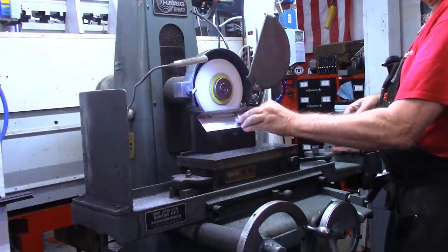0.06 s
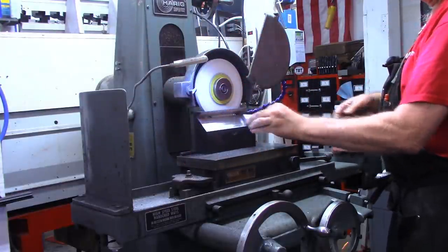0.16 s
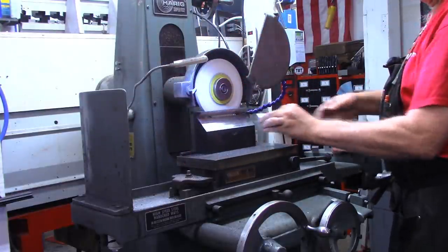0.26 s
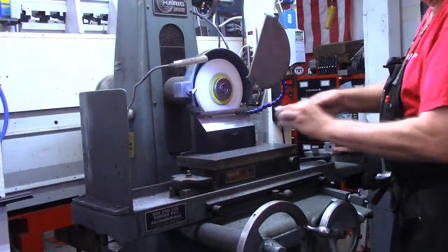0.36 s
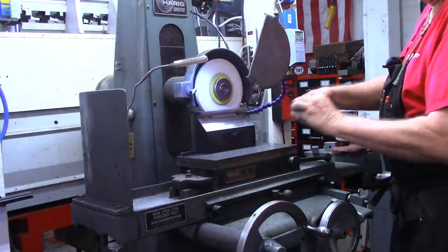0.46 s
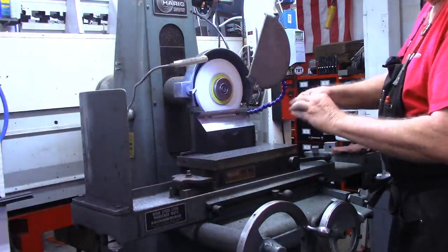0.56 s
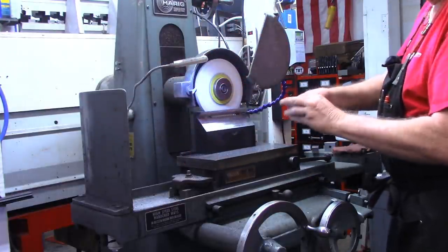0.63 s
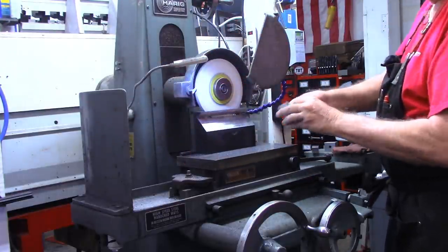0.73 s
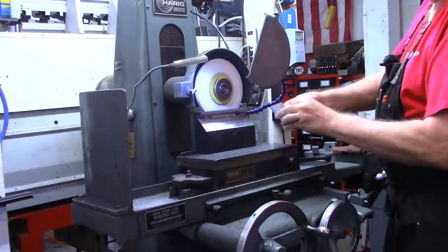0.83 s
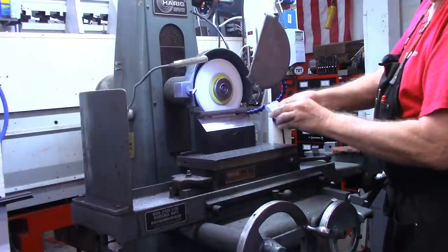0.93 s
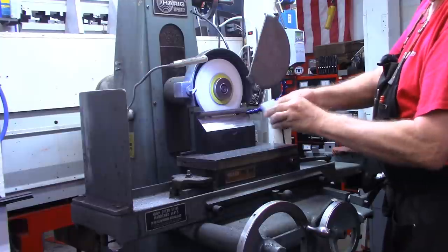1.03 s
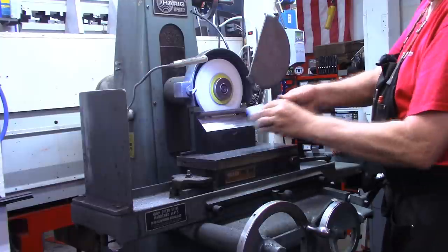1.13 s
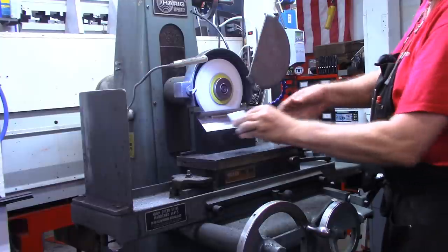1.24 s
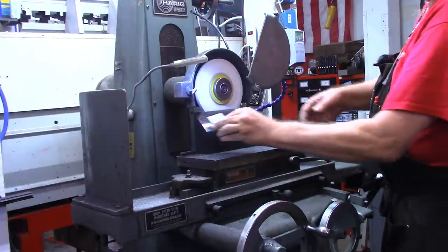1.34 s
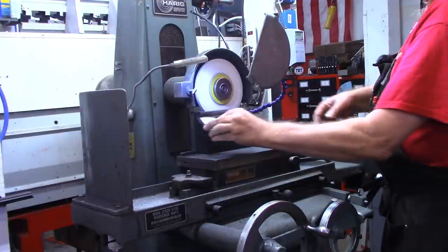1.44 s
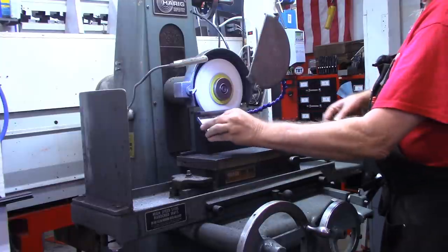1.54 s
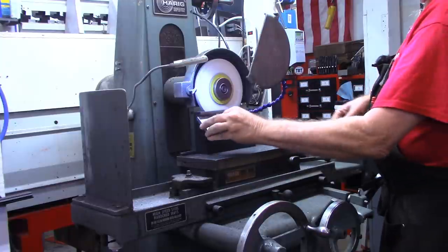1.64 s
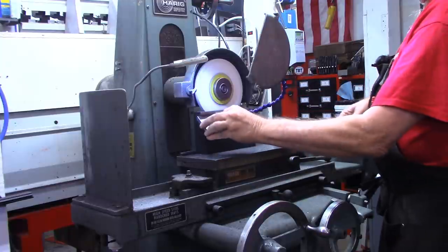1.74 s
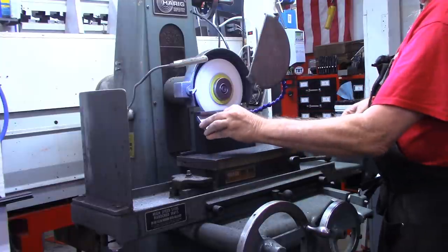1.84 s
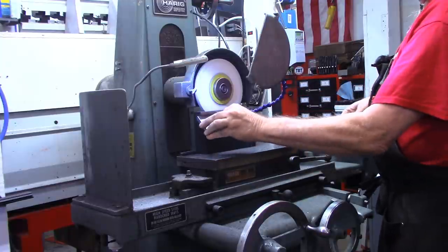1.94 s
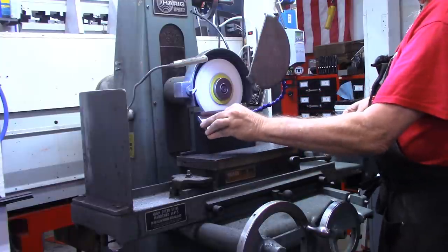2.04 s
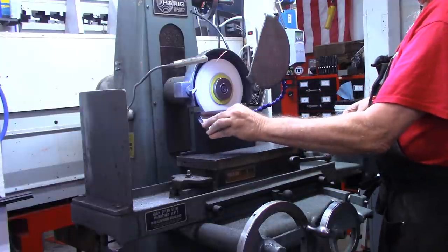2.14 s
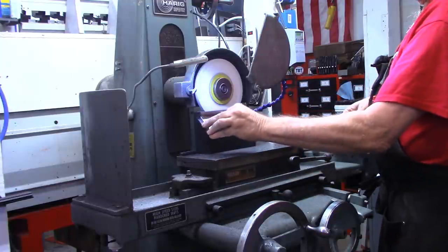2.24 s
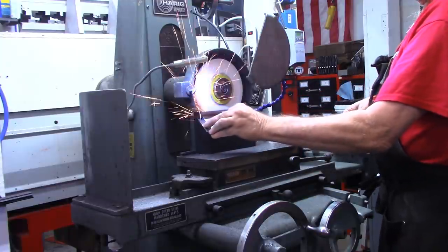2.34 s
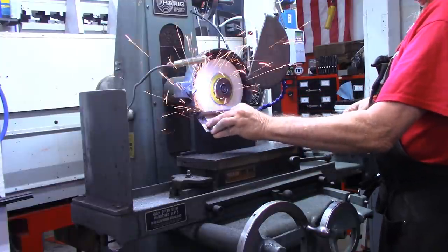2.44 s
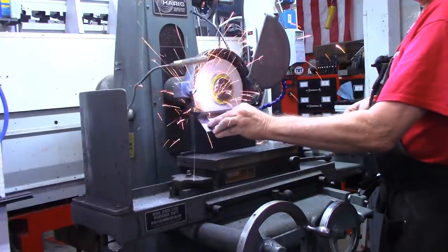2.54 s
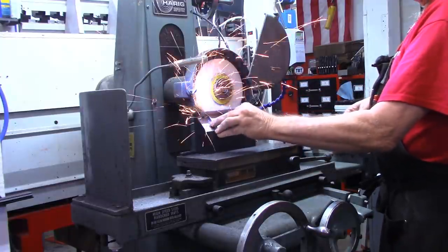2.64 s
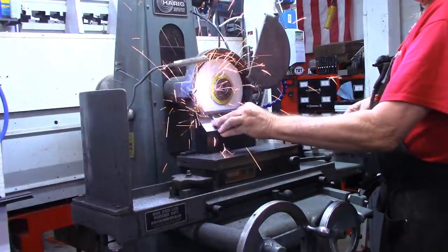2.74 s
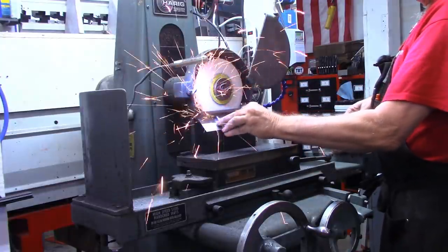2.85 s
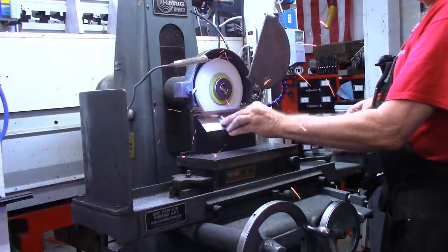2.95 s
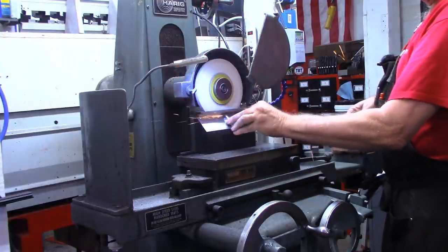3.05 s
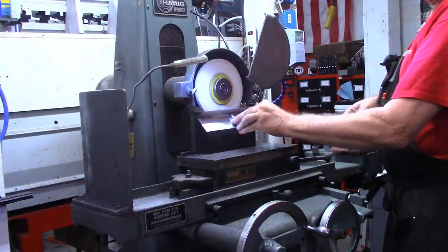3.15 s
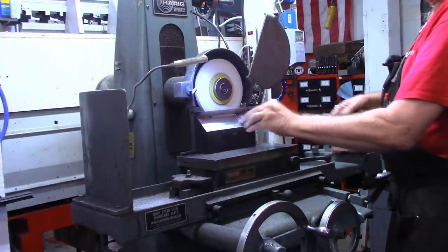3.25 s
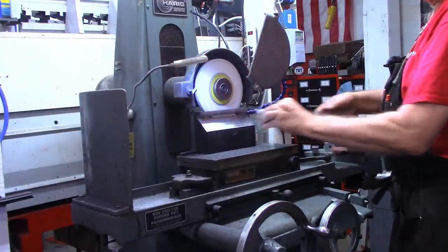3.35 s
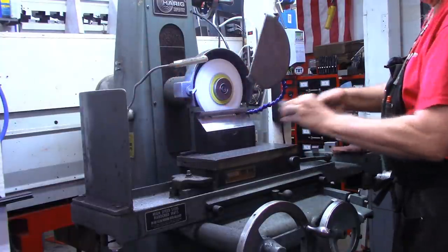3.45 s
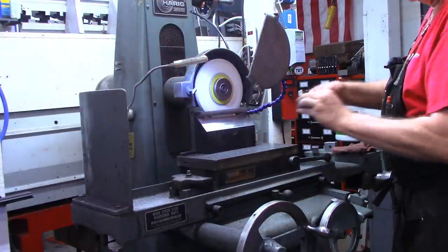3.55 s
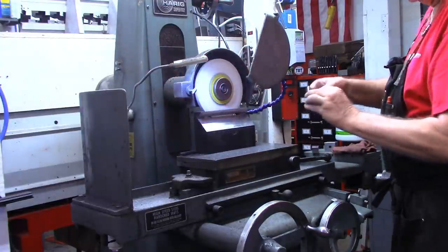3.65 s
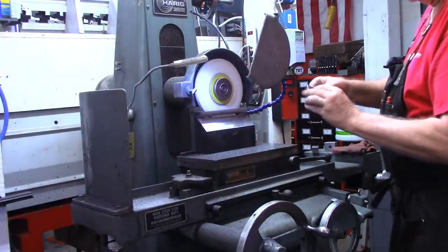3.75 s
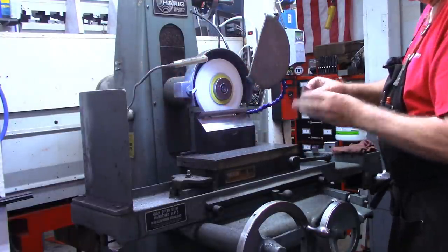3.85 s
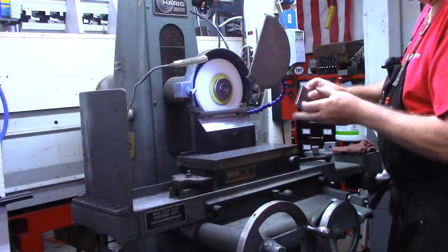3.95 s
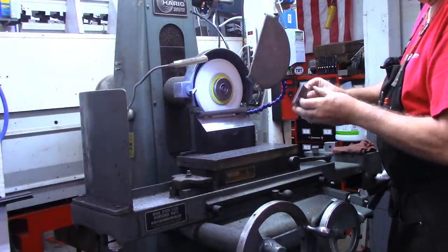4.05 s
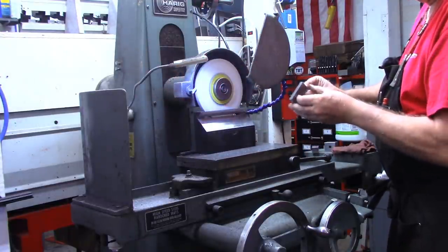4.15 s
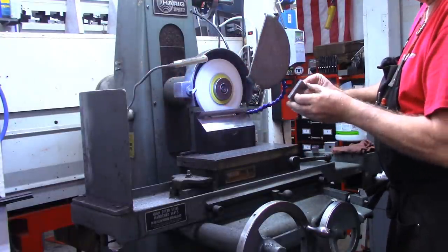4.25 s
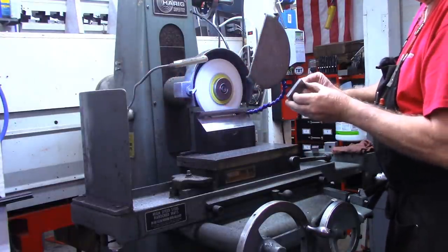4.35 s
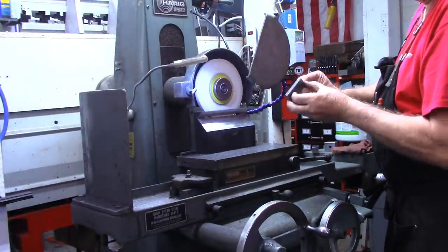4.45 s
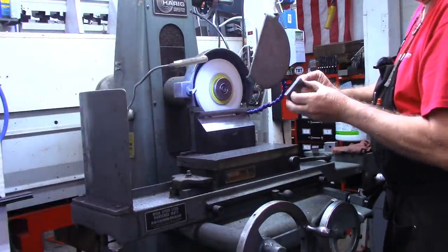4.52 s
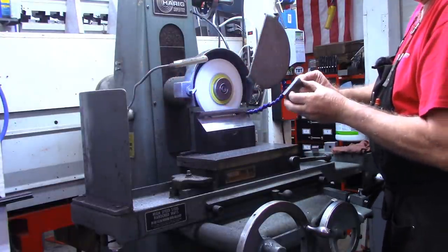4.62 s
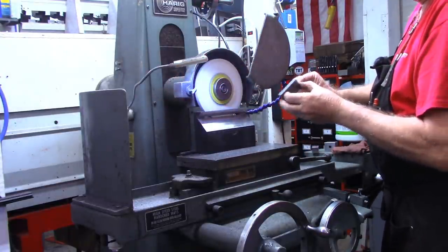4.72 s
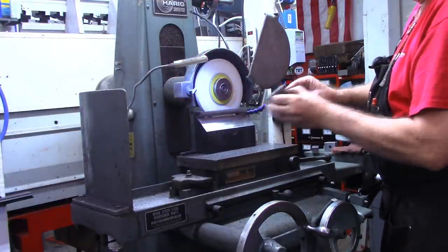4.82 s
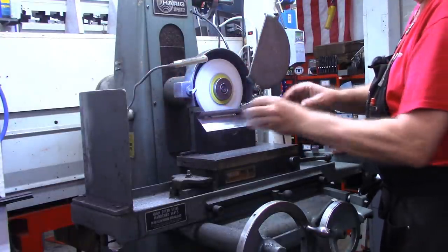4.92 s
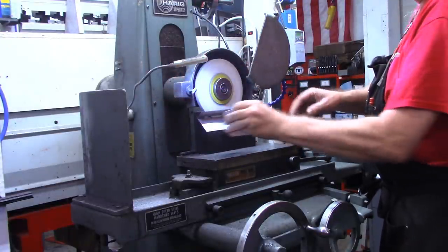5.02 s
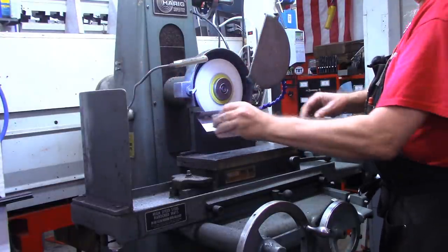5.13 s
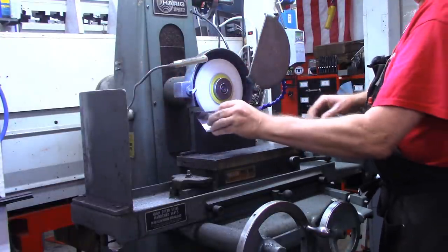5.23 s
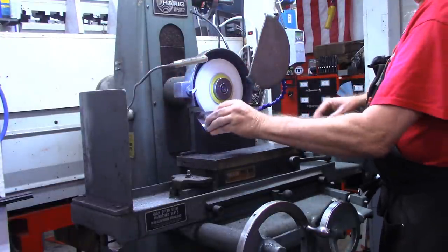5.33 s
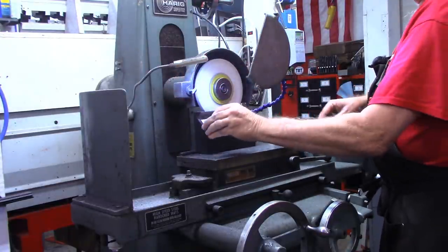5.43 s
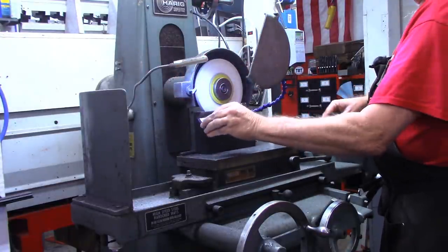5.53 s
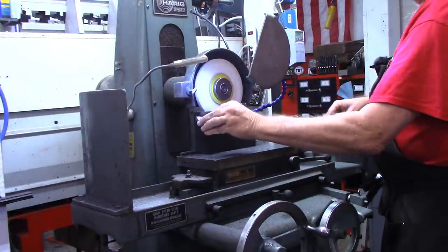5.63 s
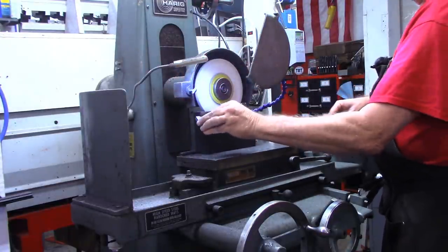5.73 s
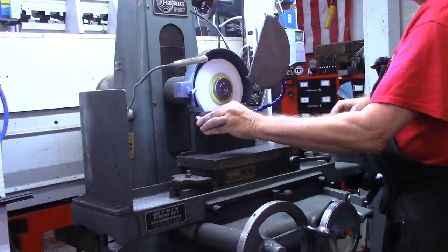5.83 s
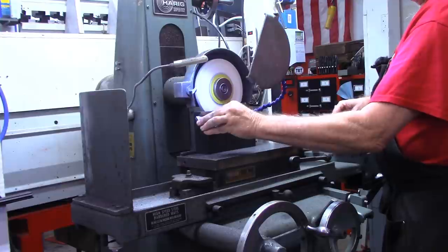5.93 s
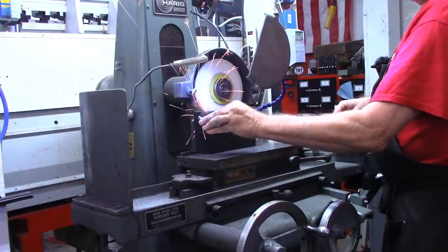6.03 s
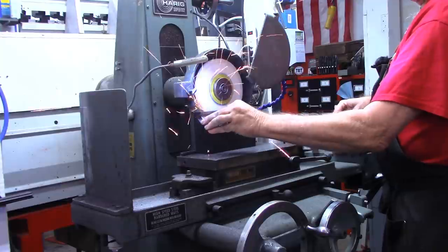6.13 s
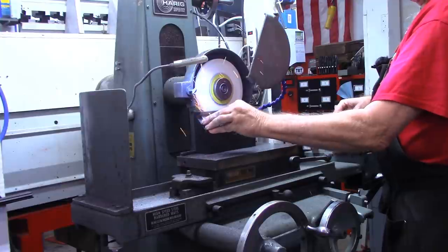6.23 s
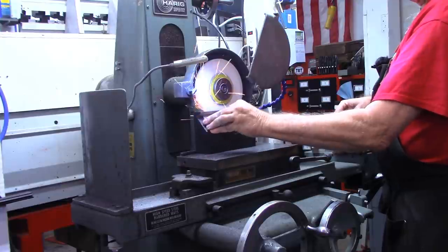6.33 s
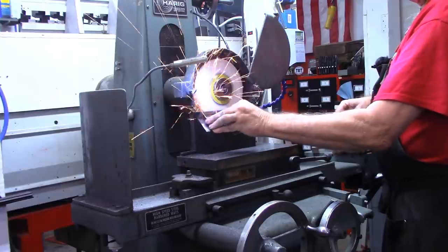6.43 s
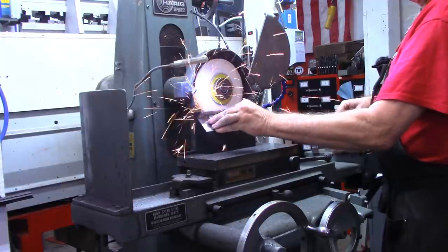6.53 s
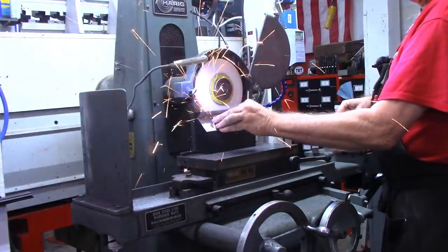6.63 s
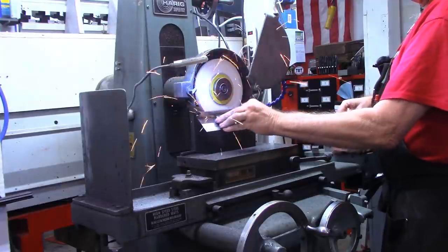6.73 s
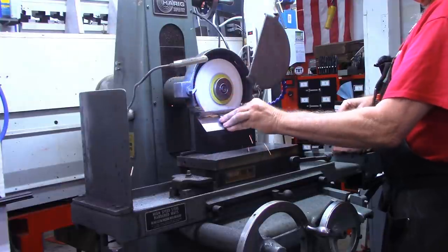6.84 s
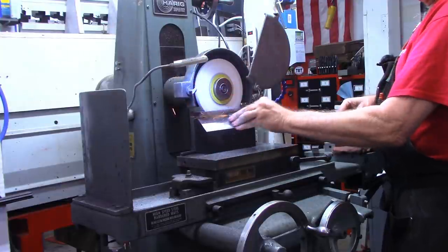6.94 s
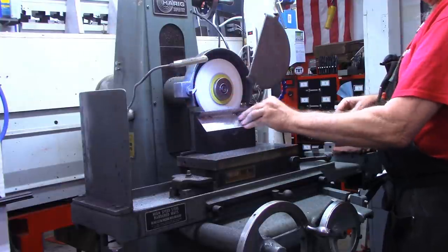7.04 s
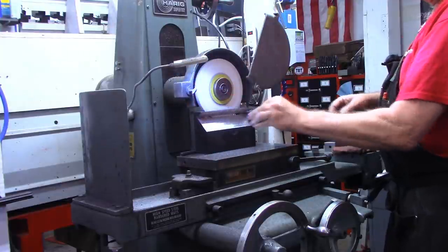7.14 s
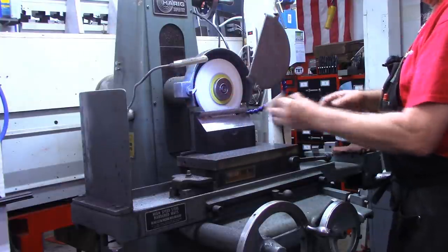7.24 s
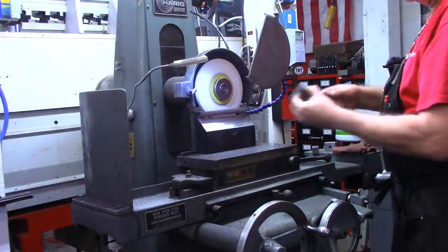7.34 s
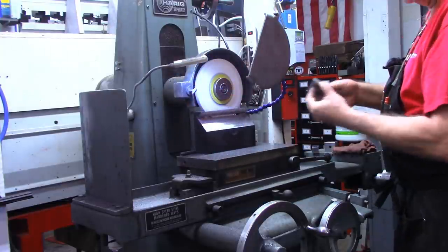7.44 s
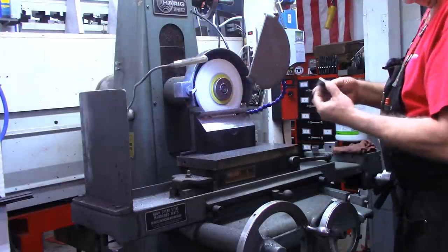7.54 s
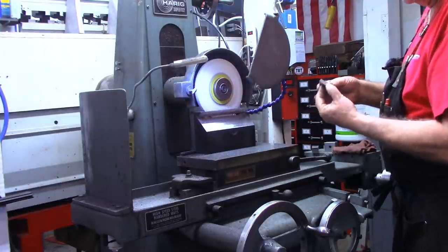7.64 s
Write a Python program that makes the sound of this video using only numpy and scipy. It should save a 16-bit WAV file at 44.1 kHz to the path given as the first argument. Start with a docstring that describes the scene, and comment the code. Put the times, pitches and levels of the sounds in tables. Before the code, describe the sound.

A grinding machine idles throughout in a workshop with little echo: a quiet airy whirr, a motor hum and a thin high whine, with occasional soft, low bumps. At about 1.6 and 1.9 seconds a small steel piece clicks lightly on the rest. It brushes the wheel at 2.2 seconds, then grinds loudly from 2.4 with a hissing scrape and a shrill metallic ring. Near 2.9 seconds the sound drops in level and rises into a rasp, stopping at 3.2. The machine idles alone until 5.7 seconds, when the steel grazes the wheel with a short, bright ring. A second pass runs from 6.0 to 7.1 seconds, briefly rising in pitch around 6.3, loudest around 6.5, then ending in a softer, higher rasp and a faint ring. The idling continues to the end at about 7.5 seconds.

```python
"""Grinding a small steel piece

In a workshop, a hand presses a steel piece against the wheel of a surface grinder, in two passes.
The wheel's grit repeats with every turn and shakes the piece at its natural tones (its modes);
tipping it onto an edge makes them rise and rasp. It clicks on the rest and rings when it grazes
the wheel. All along, the idling machine whirrs and hums, with soft low bumps."""
import sys
import numpy as np
from scipy import signal
from scipy.fft import rfft, irfft, next_fast_len
from scipy.io import wavfile
from scipy.ndimage import map_coordinates

SR = 44100
rng = np.random.default_rng(int(sys.argv[2]) if len(sys.argv) > 2 else 0)


def bounce(signal):
    """Save signal as a 16-bit WAV file at the path given by the first command-line argument."""
    frames = np.transpose(np.atleast_2d(signal))
    limited = np.clip(frames, -1, 1)
    pcm = np.round(limited * 32767).astype(np.int16)
    wavfile.write(sys.argv[1], SR, pcm)


N = 338688
TURN_HZ, TOP_HZ = 59.99, 15350  # turns of the wheel each second; highest frequency heard

# tone colour of grit scraping steel: (frequency [Hz], level [dB])
SCRAPE_COLOUR = [(300, -28.5), (1000, -6.5), (2600, 2), (3300, 1.5), (4000, 14.5), (4800, 9), (5300, 4),
                 (5850, 11), (6400, 7), (7300, 5), (7900, -1), (9300, 0), (11000, -5), (12500, -20),
                 (15200, -18.5)]
# tone colour of the shaking wheel and its guard: (frequency [Hz], level [dB])
WHEEL_COLOUR = [(100, -40), (230, -27), (320, -5.5), (430, -11.5), (520, -2.5), (650, 5.5), (820, 3),
                (1150, 4), (1900, 11), (2500, -7), (3500, -40)]


def amp(db):
    """Turn decibels into a gain."""
    return 10 ** (np.asarray(db) / 20)


def unit(x):
    """Scale a signal to an average (rms) level of 1."""
    return x / np.sqrt(np.mean(x ** 2) + 1e-20)


def wobble(rate, size):
    """A smooth random curve through `rate` new values a second."""
    knots = rng.standard_normal(int(size * rate / SR) + 4)
    return map_coordinates(knots, [np.arange(size) * rate / SR], mode="nearest")


def coloured(x, points):
    """Give x the tone colour of (frequency [Hz], level [dB]) points, at an average level of 1."""
    size = next_fast_len(len(x) + 8192)
    hz, db = np.transpose(points)
    gain = amp(np.interp(np.log(np.fft.rfftfreq(size, 1 / SR) + 1), np.log(hz), db))
    return unit(irfft(rfft(x, size) * gain, size)[:len(x)])


def add(track, start, sound):
    """Mix a sound into the track at `start` seconds."""
    part = track[round(start * SR):][:len(sound)]
    part += sound[:len(part)]


def fade(t, t60):
    """Die away by 60 dB every t60 seconds."""
    return np.exp(-np.log(1000) * t / t60)


def machine_tones(lines, waver_db, waver_rate, drift_hz):
    """Steady tones of spinning parts, wavering in level and pitch."""
    out = np.zeros(N)
    for hz, db in lines:
        phase = 2 * np.pi * np.cumsum(hz + drift_hz * wobble(30, N)) / SR
        out += np.sqrt(2) * amp(db) * unit(amp(waver_db * wobble(waver_rate, N)) * np.sin(phase))
    return out


def idling_machine():
    """The wheel drags air round, the motor hums and a bearing whines thinly."""
    # tone colour of the wheel's wind: (frequency [Hz], level [dB])
    wind_colour = [(12, -15), (20, 3.5), (64, -8.5), (85, -13.5), (112, -4), (140, -14.5), (201, -8.5),
                   (273, -12), (341, -5.5), (476, -7), (578, -4.5), (1100, -1.5), (1600, -5), (3520, -16),
                   (5050, -11), (15400, -36.5)]
    # motor and spindle tones: (frequency [Hz], level [dB])
    motor_tones = [(59.3, -79.5), (112, -85), (1120, -75), (1386, -76), (1992, -79.5), (2272, -85.5)]
    # bearing tones: (frequency [Hz], level [dB])
    bearing_tones = [(4963, -79), (5082, -89.5), (5205, -77.5), (5324, -78), (9685, -93), (10406, -91)]
    wind = coloured(rng.standard_normal(N), wind_colour) * amp(-58.5 + 0.3 * wobble(4, N))
    hum = machine_tones(motor_tones, waver_db=2.0, waver_rate=6.2, drift_hz=1.7)
    whine = machine_tones(bearing_tones, waver_db=-1.2, waver_rate=0.89, drift_hz=14)
    return wind + hum + whine


def bumps():
    """Soft, dull bumps: short bursts of deep noise."""
    # each bump: (time [s], level [dB])
    bump_times = [(0.084, -48), (0.68, -49.5), (1.438, -55), (2.097, -55), (2.299, -47.5), (3.26, -46),
                  (5.04, -46), (5.848, -49), (6.25, -53), (7.131, -51)]
    thud_colour = [(15, -7), (35, -1), (90, -12), (190, -8), (260, -30), (600, -94.5)]
    out, t = np.zeros(N), np.arange(SR // 3) / SR
    rise = 1 - np.exp(-t / 0.0018)
    for start, db in bump_times:
        thud = coloured(rng.standard_normal(len(t)), thud_colour)
        add(out, start, amp(db - 1) * rise * fade(t, 0.09) * thud)
    return out


def clicks(bounces=3, bounce_s=0.008, bounce_loss_db=7.5):
    """Steel set on the rest: a thin ping and a dry tick that bounces ever more softly."""
    # the piece touches the rest: (time [s], tick level [dB], ping level [dB])
    touches = [(1.557, -40.5, -55), (1.852, -35, -71)]
    # tone colour of a tick on the rest: (frequency [Hz], level [dB])
    tick_colour = [(300, -50), (800, -7), (1300, 8.5), (2100, -11), (2900, 3), (3700, -10.5), (6500, -10.5),
                   (8000, -31), (15000, -47)]
    out, t = np.zeros(N), np.arange(SR // 4) / SR
    rise = 1 - np.exp(-t / 0.001)
    ping = rise * fade(t, 0.07) * np.sin(2 * np.pi * 8980 * t)
    for start, tick_db, ping_db in touches:
        for k in range(bounces):
            tick = rise * fade(t, 0.035) * coloured(rng.standard_normal(len(t)), tick_colour)
            add(out, start + k * bounce_s, amp(tick_db - k * bounce_loss_db) * tick)
        add(out, start, amp(ping_db) * ping)
    return out


def grazes():
    """A brief brush with the wheel: a puff of grit, and the piece rings on freely."""
    # the piece grazes or leaves the wheel: (time [s], level [dB])
    brushes = [(2.174, -53), (2.184, -44.5), (3.16, -57), (5.717, -36.5), (5.733, -39), (7.07, -49.5)]
    # modes of the freely ringing piece: (frequency [Hz], level [dB], time to fade by 60 dB [s])
    free_modes = [(1990, -19, 0.16), (2196, -10, 0.068), (3945, -4.5, 0.19), (4274, -5.5, 0.13),
                  (6670, -0.5, 0.34), (7270, 2.5, 0.062), (9140, -7, 0.12), (9400, -25, 0.35),
                  (10460, -13, 0.16), (13300, -28.5, 0.176), (14300, -26, .18)]
    out, t = np.zeros(N), np.arange(SR // 2) / SR
    rise = 1 - np.exp(-t / 0.00032)
    for start, db in brushes:
        ring = sum(amp(level + rng.normal()) * fade(t, t60) * np.sin(2 * np.pi * (hz * t + rng.random()))
                   for hz, level, t60 in free_modes)
        noise = rng.standard_normal(len(t))
        scuff = 0.52 * coloured(noise, SCRAPE_COLOUR) + 0.33 * coloured(noise, WHEEL_COLOUR)
        add(out, start, amp(db) * rise * (1.3 * ring + fade(t, 0.07) * scuff))
    return out


def leaning(t, tip_s=0.04, settle_s=0.05):
    """How far the hand tips the piece, from flat (0) to on its edge (1)."""
    # spells on the edge: (start [s], end [s], lean [0-1])
    tips = [(2.936, 3.192, 1.0), (6.214, 6.414, 0.92), (6.794, 7.087, 0.96)]
    return sum(lean * np.clip(np.minimum((t - start) / tip_s, (end - t) / settle_s), 0, 1)
               for start, end, lean in tips)


def rim(turns, uneven_db, size=4096):
    """One random pattern of grit round the wheel's rim, which comes back at every turn."""
    count = int(TOP_HZ / TURN_HZ)
    harmonics = amp(uneven_db * rng.standard_normal(count)) * np.exp(2j * np.pi * rng.random(count))
    pattern = irfft(np.append(0, harmonics), size)
    return unit(np.interp(turns % 1, np.arange(size) / size, pattern))


def cutting_force(t, lean, wear=0.47, wear_rate=10.61):
    """A repeating grit pattern that wears as the piece moves, plus chips that never repeat."""
    turns = np.cumsum(TURN_HZ * (1 + 0.00064 * wobble(8.07, len(t)))) / SR
    grit = rim(turns, uneven_db=2.5)
    grit += wear * sum(wobble(wear_rate, len(t)) * rim(turns, uneven_db=7) for _ in range(4))
    chip_share = np.clip(0.22 + 0.4 * lean, 0, 1)
    force = np.sqrt(1 - chip_share) * unit(grit) + np.sqrt(chip_share) * rng.standard_normal(len(t))
    # the wheel is slightly out of round and bites harder once a turn
    return force * amp(0.33 * np.sin(2 * np.pi * turns))


def narrow(x, width_hz):
    """Keep a narrow band around 0 Hz and bring it to a standard level."""
    lowpass = signal.butter(2, np.clip(width_hz / 2, 2, 2000), fs=SR, output="sos")
    band = signal.sosfilt(lowpass, x)
    return band / np.sqrt(np.mean(np.abs(band) ** 2) / 2)


def resonate(force, modes, lean, place, grip_hz, edge_damping=1.43, wander_db=1.5):
    """The force shakes the modes; an edge raises and damps them, and the contact place sets their mix."""
    out, edge = np.zeros(len(force)), np.clip(lean, 0, 1)
    for hz, width_hz, db, rise_hz, place_db in modes:
        spin = np.exp(2j * np.pi * np.cumsum(hz + rise_hz * lean) / SR)
        drive = force / spin  # shift the mode's pitch to 0 Hz; multiplying by spin shifts it back
        flat = narrow(drive, width_hz + grip_hz)
        tipped = narrow(drive, width_hz + grip_hz + edge_damping * rise_hz)
        swing = (1 - edge) * flat + edge * tipped
        # the hand is never quite still, so the modes take turns at being loudest
        gain = amp(db + place_db * place + wander_db * wobble(12.18, len(force)))
        out += gain * np.real(swing * spin)
    return out


def grind(push, growl_db, ring_db, shriek_db, first_place, grip_hz):
    """One pass against the wheel: the harder the push, the louder the piece, the cut and the wheel."""
    # low, middle and high modes of the pressed piece:
    # (frequency [Hz], width [Hz], level [dB], rise on edge [Hz], level change with place [dB])
    growl_modes = [(1390, 430, -22, 37, 10), (1709, 100, -13.5, 394.5, -1), (2169, 52, -4.5, 678, 5)]
    ring_modes = [(3940, 77, -8.5, 55, -12), (4300, 58, -13.5, 230, 12.5), (4350, 1000, -18.5, 60, 2.5)]
    shriek_modes = [(6621, 107, -0.5, 80, -5), (7107, 38, -5.5, 100, -0.5), (8865, 260, -18, 330, -13.5),
                    (9840, 70, -18, 52, -11), (10355, 33, -14, 140, -6.5), (11550, 82, -27, 150, -29),
                    (13370, 80, -28.5, 30, 2), (14200, 110, -29.5, 78, -4)]
    bite_s, slide_s, release_db_per_s, firm_push_db = 0.01, 0.63, 397, -35
    times, levels = np.transpose(push)
    touch, leave = times[0], times[-1]
    t = np.arange(touch, leave + 1 / 4, 1 / SR)
    age, lean = t - touch, leaning(t)
    push_db = np.interp(t, times, levels) - release_db_per_s * np.maximum(t - leave, 0)
    extra_push_db = push_db - firm_push_db
    place = first_place * np.clip(1 - age / slide_s, 0, 1)  # the contact slides to the near end (0)
    force = cutting_force(t, lean)
    # only a true edge stiffens the contact, and it never sits still
    skitter = lean ** 2 * (1 + 0.2 * wobble(70, len(t)))
    # an edge digs in, driving the lower modes and choking the high ones;
    # ring and shriek calm down as the piece beds in
    families = [(growl_modes, growl_db + 3 * lean),
                (ring_modes, ring_db + 0.21 * extra_push_db + 1.5 * lean - 4.5 * age),
                (shriek_modes, shriek_db - 0.11 * extra_push_db - 3 * lean - 10 * age)]
    piece = sum(amp(db) * resonate(force, modes, skitter, place, grip_hz) for modes, db in families)
    # the cut hisses, a little louder on an edge
    scrape = amp(0.48 + 1.3 * lean) * coloured(force, SCRAPE_COLOUR)
    # flat, firm contact also shakes the wheel and its guard
    wheel_db = -7 - 4.2 * lean - 2.2 * place + 0.46 * wobble(9, len(t))
    wheel = amp(wheel_db) * coloured(force, WHEEL_COLOUR)
    return np.clip(age / bite_s, 0, 1) * amp(push_db) * (piece + scrape + wheel)


def workshop(x, t60, echo_db):
    """The walls add a short, slightly dull echo."""
    wall_colour = [(200, -0.5), (3000, 10.5), (7000, -5), (15000, -11.5)]
    t = np.arange(SR // 2) / SR
    tail = coloured(rng.standard_normal(len(t)), wall_colour) * fade(t, t60) * (t > 0.005)
    return x + amp(echo_db) * signal.fftconvolve(x, tail / np.linalg.norm(tail))[:N]


def scene():
    """Both passes and the small contacts in the room, over the idling machine."""
    # how hard the hand presses, one curve for each pass: (time [s], level [dB])
    pushes = [
        [(2.181, -52), (2.201, -42.5), (2.311, -50), (2.387, -32.5), (2.629, -34), (2.919, -31.5), (2.951, -41),
         (3.047, -49), (3.155, -46.5), (3.16, -51.5)],
        [(6.024, -52), (6.038, -44), (6.064, -32), (6.162, -32.5), (6.302, -39), (6.436, -29), (6.734, -34.5),
         (6.876, -44.5), (6.92, -44.5), (7.07, -45.5)],
    ]
    # how each pass starts, with levels relative to the push:
    # (growl [dB], ring [dB], shriek [dB], contact place along the piece [0-1], damping by the grip [Hz])
    pass_settings = [(-3.5, 13, 12, 0, 25), (-5.5, 7.5, 10.5, 0.94, 76)]
    work = grazes() + clicks()
    for push, settings in zip(pushes, pass_settings):
        add(work, push[0][0], grind(push, *settings))
    return (workshop(work, t60=0.22, echo_db=-11) + idling_machine() + bumps())[None]


def record(dry):
    """Cut away the very highest treble, above TOP_HZ."""
    size = next_fast_len(N + 8192)
    kept = np.fft.rfftfreq(size, 1 / SR) < TOP_HZ
    return irfft(rfft(dry, size) * kept, size)[:, :N]


dry = scene()
out = record(dry)
bounce(out)
```